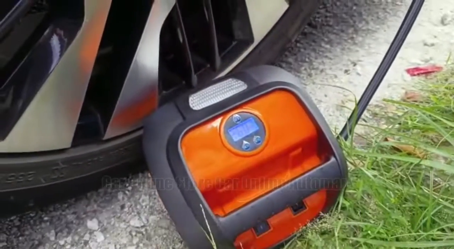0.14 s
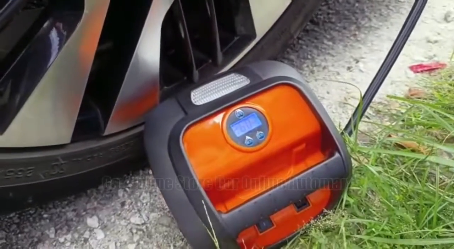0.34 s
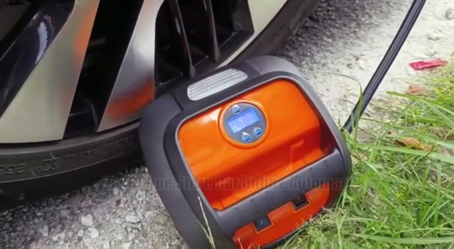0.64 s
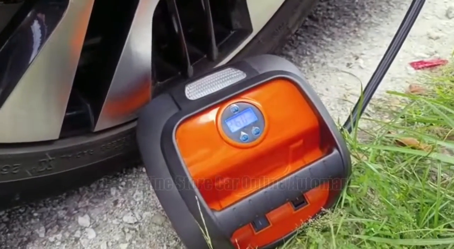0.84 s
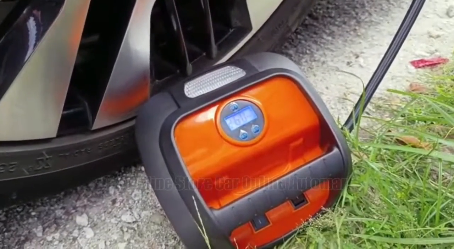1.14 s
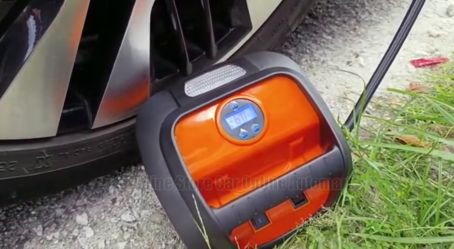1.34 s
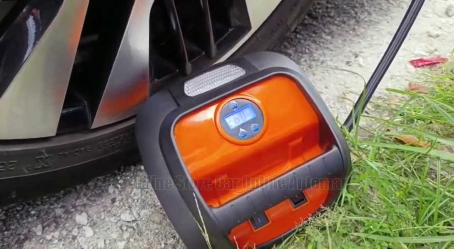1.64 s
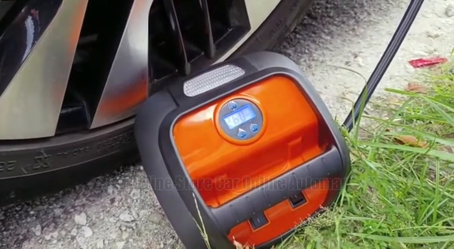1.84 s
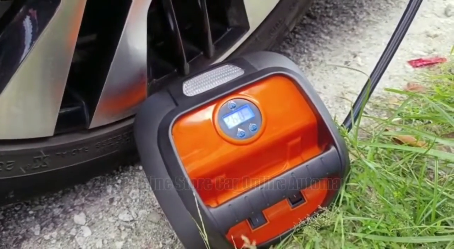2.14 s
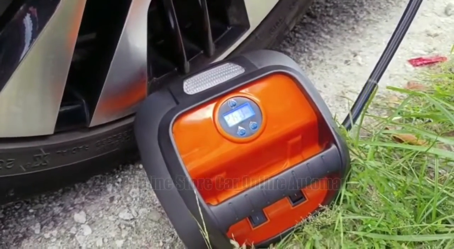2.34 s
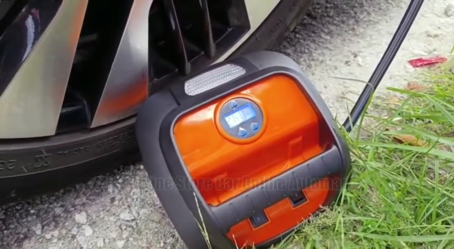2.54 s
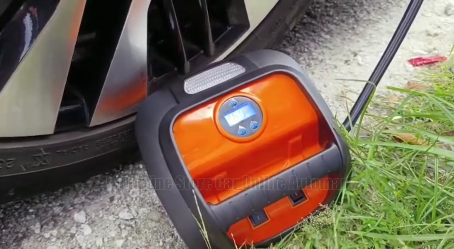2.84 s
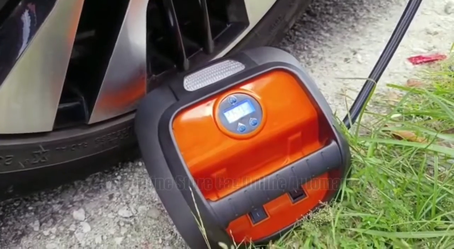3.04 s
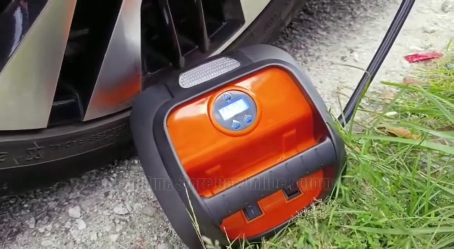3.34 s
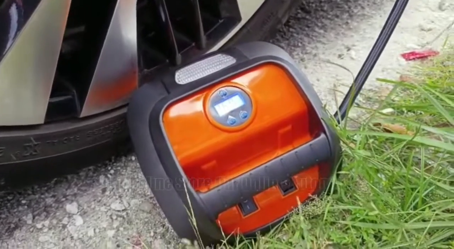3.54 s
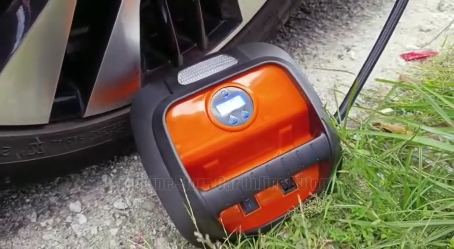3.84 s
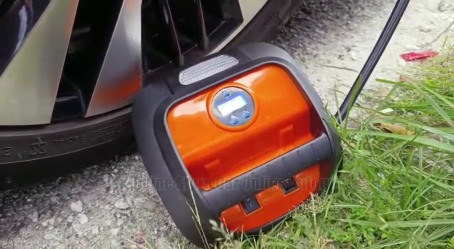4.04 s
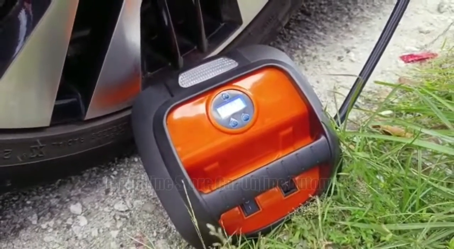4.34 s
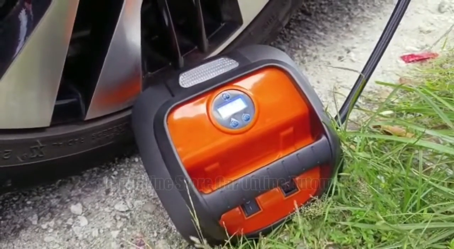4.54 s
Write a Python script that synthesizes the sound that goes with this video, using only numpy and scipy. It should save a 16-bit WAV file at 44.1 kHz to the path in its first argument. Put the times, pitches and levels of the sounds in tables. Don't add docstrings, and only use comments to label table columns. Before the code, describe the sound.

From 0 s a small piston compressor is already at full speed, close to a stereo phone microphone outdoors, and it never stops. Roughly forty-one strokes per second fuse into a coarse, dense buzz: strong metallic tones around 600 to 1200 Hz, with more up to about 2500 Hz, mixed with geared motor whine. Each turn adds a gritty housing knock, valve slaps, a thin ringing reed and bright puffs and ticks of air. From about 0.4 to 1.7 s the pitch sags almost imperceptibly as the tyre resists; the sound grows slightly louder and duller towards 3 s. Between about 3.1 and 3.7 s the housing slips on the gravel: some tones rise, others drop, and the air ticks fade. Then it settles with stronger ticks, gradually brightening and easing slightly in level until the cut at 4.7 s. Soft low outdoor rumble drifts underneath; the sound is dry, without obvious echo.

```python
import sys
import numpy as np
from scipy import signal
from scipy.fft import irfft, next_fast_len
from scipy.io import wavfile
from scipy.ndimage import uniform_filter1d

SR = 44100
rng = np.random.default_rng(int(sys.argv[2]) if len(sys.argv) > 2 else 0)


def volts_from_db(level):
    exponent = np.asarray(level, float) / 20
    return 10 ** exponent


def log_audio(samples):
    frames = np.atleast_2d(samples).T
    limited = np.clip(frames, -1, 1)
    pcm = np.round(limited * 32767).astype(np.int16)
    wavfile.write(sys.argv[1], SR, pcm)


N = 206724
T = np.arange(N) / SR

# time_s, speed_turns_per_s
CRANK_SPEED = [
    (0.0, 41.04),
    (0.35, 41.04),
    (1.65, 40.77),
    (2.85, 40.75),
    (3.25, 40.85),
    (3.5, 40.85),
    (4.4, 40.67),
    (4.69, 40.67),
]
# time_s, loudness_db, brightness_db (of valve and air)
LOAD = [
    (0.0, -21, -5),
    (1.5, -20, -6.5),
    (3.0, -19, -7),
    (3.6, -19.5, -8),
    (4.69, -20.5, -5),
]
# crank_multiple, left_db,
# right_db
CRANK_TONES = [(2, -43, -45), (3, -48, -50), (6, -51, -50), (7, -53, -46), (8, -47, -48), (9, -54, -50),
               (12, -44, -45), (13, -48, -42), (14, -39, -36), (15, -45, -64), (16, -41, -42),
               (18, -31, -35), (19, -34, -32), (21, -46, -51), (22, -45, -49), (23, -40, -39),
               (24, -42, -37), (25, -36, -34), (26, -35, -30), (27, -36, -36), (28, -32, -34),
               (29, -41, -38), (30, -38, -41),
               (31, -49, -48), (32, -48, -43), (33, -48, -42), (34, -51, -48), (35, -57, -46),
              (36, -47, -44), (37, -53, -44), (38, -53, -46), (39, -48, -39), (40, -43, -36),
              (41, -49, -38), (45, -47, -57), (46, -47, -46), (48, -53, -48), (49, -60, -42),
              (50, -50, -36), (51, -51, -42), (52, -51, -39), (53, -38, -35), (54, -44, -38),
              (55, -46, -36), (56, -54, -38), (57, -43, -33), (58, -43, -38), (59, -47, -39),
              (60, -44, -41)]
ARRIVAL = [(2, 0.245), (12, 0.1998), (19, 0.236), (23, 0.1723), (30, 0.1864), (36, 0.143), (45, 0.1514),
           (50, -0.0317), (60, -0.038)]
# crank_multiple, change_db
SLIP_TONES = [(14, -2), (24, 6), (25, -2), (26, -4), (27, -3), (28, -4), (30, -3), (32, 4), (40, -5),
              (41, -4)]
# crank_multiples_off_whine, left_db, right_db
WHINE = [(-3, -43, -40), (-2, -38, -33), (-1, -38, -39), (0, -45, -42), (1, -32, -33), (2, -37, -39),
         (3, -37, -38), (4, -49, -46)]
# pitch_hz, left_db (per Hz), right_db (per Hz)
RATTLE_COLOUR = [(419, -76.5, -75.5), (520, -59, -65.5), (681, -84, -52.5), (736, -42, -51),
                 (915, -94, -65), (944, -51, -48.5), (1110, -55.5, -53), (1574, -66.5, -60),
                 (1634, -57.5, -46.5), (1717, -62, -81), (1960, -69, -59)]
VALVE_COLOUR = [(1737, -69.5, -65.5), (1990, -63.5, -56.5), (2477, -63.5, -50), (2460, -66.5, -69.5),
                (2930, -68, -58), (3150, -59.5, -61), (3720, -78, -72), (4150, -80, -79), (4700, -69, -81),
                (5540, -76.5, -72.5)]
REED_COLOUR = [(2525, -60.5, -60), (2638, -51.5, -55), (3000, -69.5, -66.5), (3350, -61, -71),
               (3890, -78, -73), (3977, -61.5, -56.5), (4030, -73, -68.5), (4595, -71.5, -56),
               (4800, -78, -74)]
AIR_COLOUR = [(5150, -73.5, -71.5), (6620, -74, -70.5), (6500, -82, -76.5), (7470, -69.5, -64.5),
              (7620, -72.5, -75), (8290, -72.5, -64.5), (10730, -69.5, -74.5), (11800, -64, -71.5),
              (13300, -71, -78.5), (15600, -74, -78), (15600, -91, -91)]
RUMBLE_COLOUR = [(26.5, -80, -77), (56.4, -53.5, -53.5), (75, -56, -55.5), (131, -57, -57),
                 (190, -63, -66.5), (246, -67, -60), (347, -76, -70.5), (470, -69.5, -66),
                 (476, -69, -63.5)]
# crank_angle_turns, strength_db, length_turns
KNOCKS = [
    (.05, 1, 0.026),
    (.33, 9.5, 0.043),
    (.5, -1, 0.043),
]
SLAPS = [
    (0.82, -7, 0.03),
    (0.93, -10, 0.051),
    (0.12, -11, 0.03),
    (0.26, -20, 0.033),
]
FLUTTER = [
    (0.84, -1, 0.037),
    (1, -5.5, 0.027),
    (0.118, -2.5, 0.019),
    (0.26, -3, 0.046),
]
CLACKS = [
    (1, -0.5, 0.0022),
    (0.125, -2.5, 0.0031),
    (0.255, -5, 0.0021),
    (0.885, -1, 0.0027),
]
PUFFS = [
    (0.8, 0.76, 0.2),
    (0.041, 6.1, 0.045),
    (0.11, 0.42, 0.2),
]
TICKS = [
    (0.062, 0, 0.0012),
    (0.075, -6, 0.0011),
]
# pitch_hz, likeness (0 to 1)
SAME = [(60, 1), (200, 0.97), (300, 1), (450, 0.35), (700, 0.94), (860, 0.42), (1050, 0.91), (1450, 0.061),
        (1640, 0.82), (1900, 0.52), (2350, 0.68), (3200, 0.37), (4500, 0.89), (5000, 0.017)]
# pitch_hz, lead_radians
LEAD = [(60, 0), (250, .3), (550, 1.1), (780, .8), (960, 2.1), (1150, 2.1), (1300, 1.3), (1600, 2.4),
        (2050, 1.8), (2400, 0), (2800, 0), (3200, 3), (3600, 6.2), (4500, 6.9)]

START_TURN = -.486
WHINE_ORDER = 170 / 11
HEAD_FROM = 47
SLIP_S, SLIP_LENGTH_S = 3.13, 0.534


def thrum(play):
    arrival = np.cumsum(np.interp(np.arange(64), *np.transpose(ARRIVAL)))
    slip_change = dict(SLIP_TONES)
    out = 0
    for k, left_db, right_db in CRANK_TONES:
        in_head = k >= HEAD_FROM
        share, turns_later = (0.28, .32) if in_head else (.5, .21)
        answer = np.angle(1 + share * np.exp(-2j * np.pi * k * turns_later)) / (2 * np.pi)
        offset = 0.048 * rng.standard_normal() - arrival[k] + answer
        lift_db = 0.77 * in_head
        line = tone(play, k, offset, left_db + lift_db, right_db + lift_db, waver_db=2.37)
        out = out + volts_from_db(slip_change.get(k, 0) * slip()) * line
    return volts_from_db(0.9) * out


def motor(turns):
    out = 0
    for j, left_db, right_db in WHINE:
        offset = 0.11 * j + 0.17 * rng.standard_normal()
        out = out + tone(turns, WHINE_ORDER + round(j), offset, left_db, right_db, waver_db=0.85)
    return out


def pump(turns):
    strength = rng.standard_normal(int(turns[-1]) + 4)
    bright = volts_from_db(curve(LOAD, column=2))
    out = volts_from_db(-2.5) * rattle(turns, strength)
    out = out + bright ** 0.5 * valve(turns, strength)
    return out + bright * (reed(turns, strength) + air(turns, strength))


def rattle(turns, strength):
    knocks = blows(turns, KNOCKS, strength, floor_db=0, uneven_db=2.0, loose=0.014)
    return coloured(grit(3.3) * knocks, RATTLE_COLOUR)


def valve(turns, strength):
    slaps = blows(turns, SLAPS, strength, floor_db=-4, uneven_db=0.54, loose=0.0032)
    return coloured(habit(turns, share=0.85, memory=0.82) * slaps, VALVE_COLOUR)


def reed(turns, strength):
    flutter = blows(turns, FLUTTER, strength, floor_db=-6.5, uneven_db=0.94, loose=0.0043)
    flutter = volts_from_db(-3.5) * habit(turns, share=0.86, memory=0.77) * flutter
    clacks = volts_from_db(-3.0) * clicks(turns, CLACKS, strength, loose=0.00094, apart=9)
    return coloured(flutter + clacks, REED_COLOUR)


def air(turns, strength):
    puffs = blows(turns, PUFFS, strength, floor_db=-0.37, uneven_db=.7, loose=.006)
    puffs = habit(turns, share=0.22, memory=.6) * puffs
    tick_db = -7 - 12 * slip() + 2.7 * (T > SLIP_S + SLIP_LENGTH_S)
    ticks = volts_from_db(tick_db) * clicks(turns, TICKS, strength, loose=0.0028, apart=5)
    return coloured(puffs + ticks, AIR_COLOUR)


def rumble():
    noise = coloured(rng.standard_normal((2, N)), RUMBLE_COLOUR)
    return noise * volts_from_db(0.5 + 1.5 * drift(top_hz=1.0))


def slip():
    return np.clip(np.minimum(T - SLIP_S, SLIP_S + SLIP_LENGTH_S - T) / .06, 0, 1)


def tone(turns, order, offset, left_db, right_db, waver_db):
    lag = read(LEAD, order * CRANK_SPEED[0][1]) * np.array([[0], [1]])
    waver = volts_from_db(waver_db * drift(top_hz=5) - .115 * waver_db ** 2)
    level = np.sqrt(2) * volts_from_db([[left_db], [right_db]])
    return level * waver * np.cos(2 * np.pi * (order * turns + offset) - lag)


def blows(turns, table, strength, floor_db, uneven_db, loose):
    out = volts_from_db(floor_db)
    for angle, db, length in table:
        size, shift = rng.standard_normal((len(strength), 2)).T
        turn = np.floor(turns - angle).astype(int) + 2
        late = loose * abs(shift[turn])
        u = np.maximum((turns - angle) % 1 - late, 0) / length
        blow_db = db + uneven_db * (size + strength)[turn] / np.sqrt(2)
        out = out + volts_from_db(blow_db) * u * np.exp(1 - u)
    return out / np.sqrt(np.mean(out ** 2))


def clicks(turns, table, strength, loose, apart):
    push = blows(turns, table, strength, floor_db=-60, uneven_db=1.0, loose=loose)
    return np.array([push, np.roll(push, apart)])


def grit(spread_db):
    grains = volts_from_db(spread_db * uniform_filter1d(rng.standard_normal(N), size=16) * 2)
    return rng.standard_normal((2, N)) * grains / np.sqrt(np.mean(grains ** 2))


def habit(turns, share, memory):
    share, memory = np.clip([share, memory], 0, .98)
    fresh = rng.standard_normal((2, int(turns[-1]) + 12, 1024))
    patterns = signal.lfilter([np.sqrt(1 - memory ** 2)], [1, -memory], fresh, axis=1)
    turn = np.floor(turns).astype(int) + 10
    place = (turns % 1 * 1024).astype(int)
    repeated = patterns[:, turn, place]
    return np.sqrt(share) * repeated + np.sqrt(1 - share) * rng.standard_normal((2, N))


def coloured(drive, points, skirt_db=70):
    size = next_fast_len(N + 8192)
    hz = abs(np.fft.fftfreq(size, 1 / SR))
    outside = np.log2(np.clip(hz, points[0][0], points[-1][0]) / (hz + 1))
    skirt = skirt_db * np.minimum(abs(outside), 1)
    left = read(points, hz, column=1) - skirt
    right = read(points, hz, column=2) - skirt
    phase = -signal.hilbert(np.log(volts_from_db((left + right) / 2))).imag
    a, b = np.fft.fft(drive, size)
    same = np.clip(read(SAME, hz), 0, 1)
    other = same * a * np.exp(-1j * read(LEAD, hz)) + np.sqrt(1 - same ** 2) * b
    z = np.array([a * volts_from_db(left), other * volts_from_db(right)]) * np.exp(1j * phase)
    return np.sqrt(SR / 2) * irfft(z[:, :size // 2 + 1], size)[:, :N]


def read(points, hz, column=1):
    rows = np.transpose(points)
    return np.interp(np.log(hz + 1), np.log(rows[0] + 1), rows[column])


def curve(rows, column=1):
    rows = np.transpose(rows)
    return np.interp(T, rows[0], rows[column] - rows[column].mean())


def drift(top_hz):
    steps = uniform_filter1d(rng.standard_normal(400), size=3)
    return np.sqrt(3) * np.interp(T * top_hz * 6, np.arange(400), steps)


def scene():
    turns = START_TURN + np.cumsum(np.interp(T, *np.transpose(CRANK_SPEED))) / SR
    play = turns + .003 * drift(top_hz=6)
    machine = thrum(play) + motor(turns) + pump(play)
    return machine * volts_from_db(curve(LOAD)) + rumble()


def roll_off(x):
    return signal.sosfilt(signal.butter(12, 15640, fs=SR, output="sos"), x)


def record(dry):
    return roll_off(dry)


dry = scene()
out = record(dry)
log_audio(out)
```